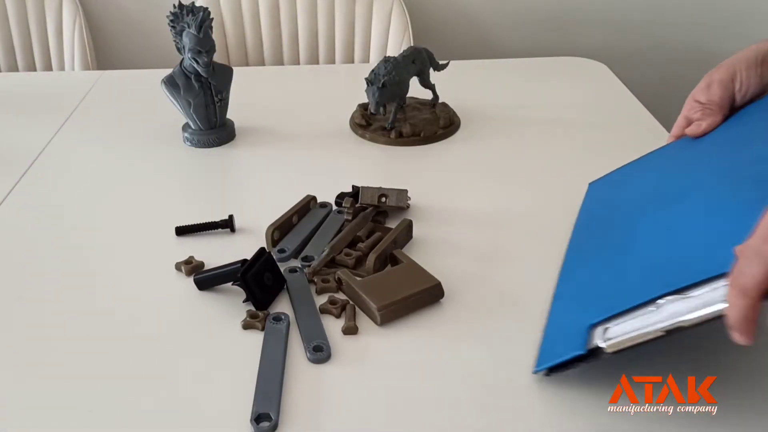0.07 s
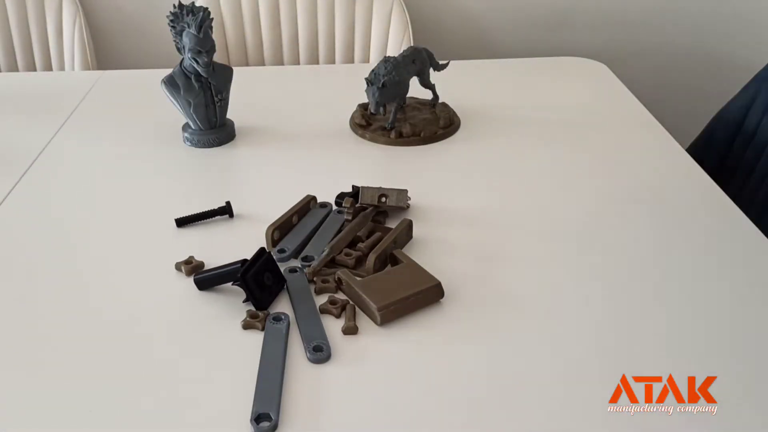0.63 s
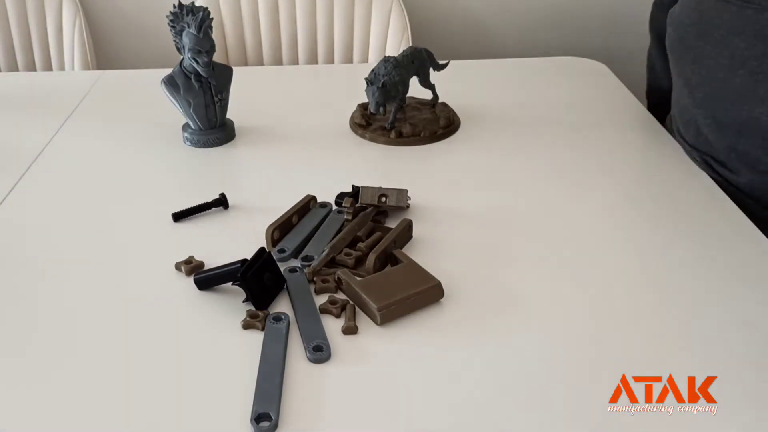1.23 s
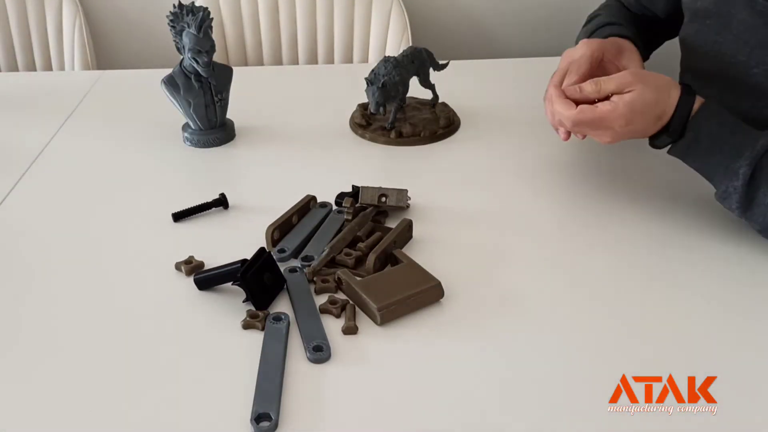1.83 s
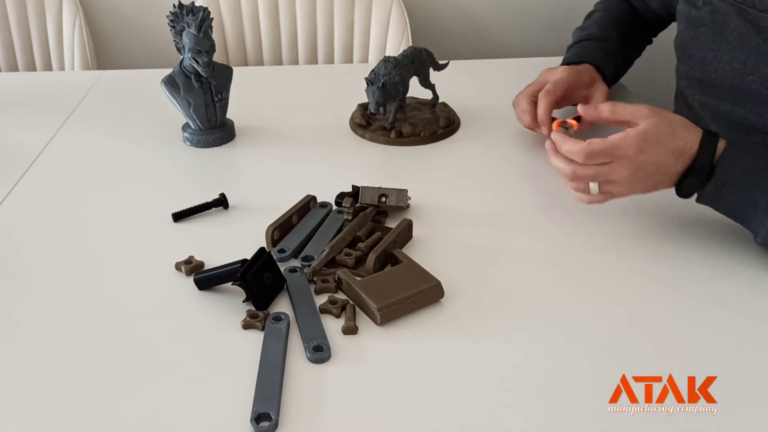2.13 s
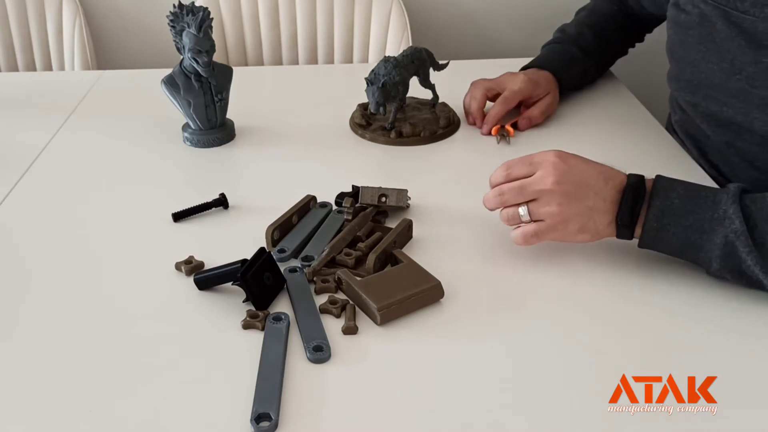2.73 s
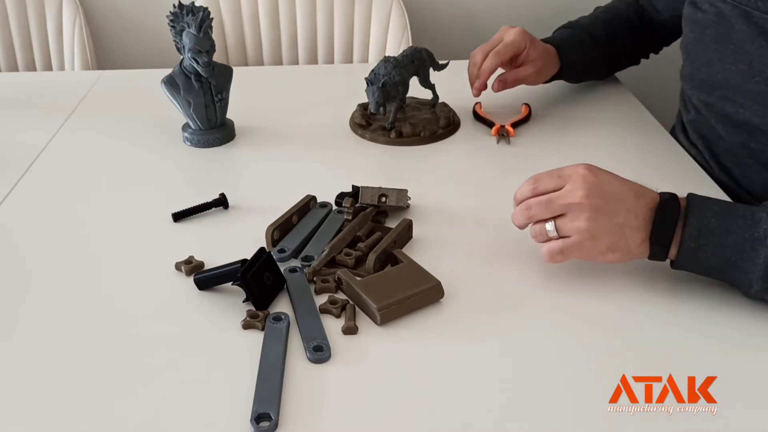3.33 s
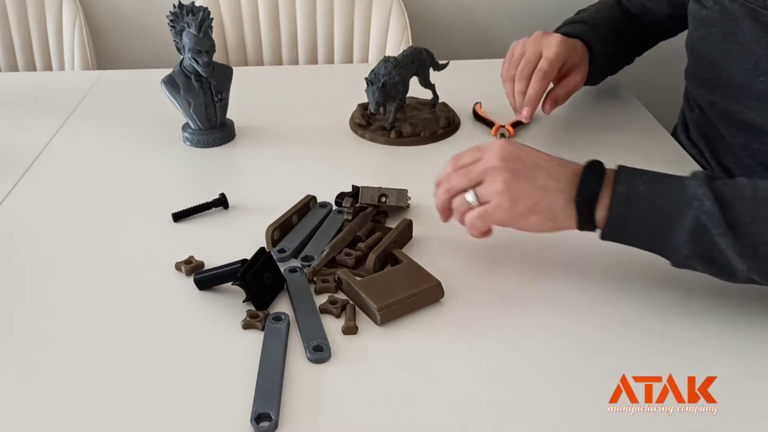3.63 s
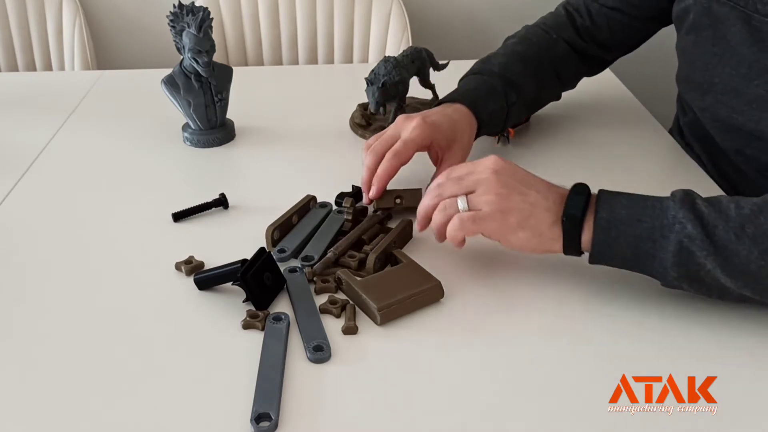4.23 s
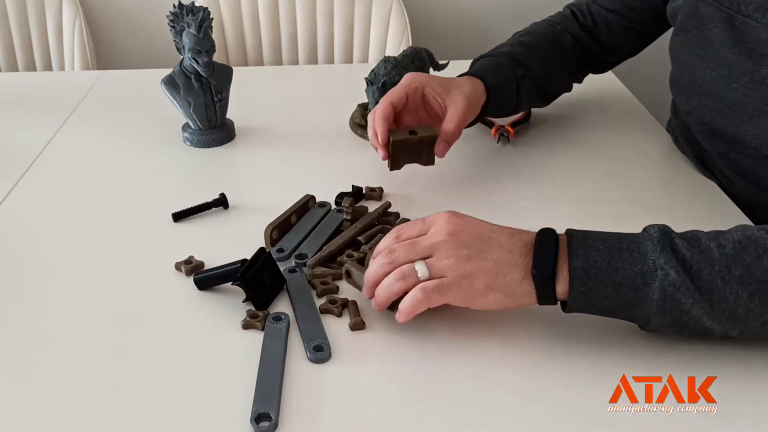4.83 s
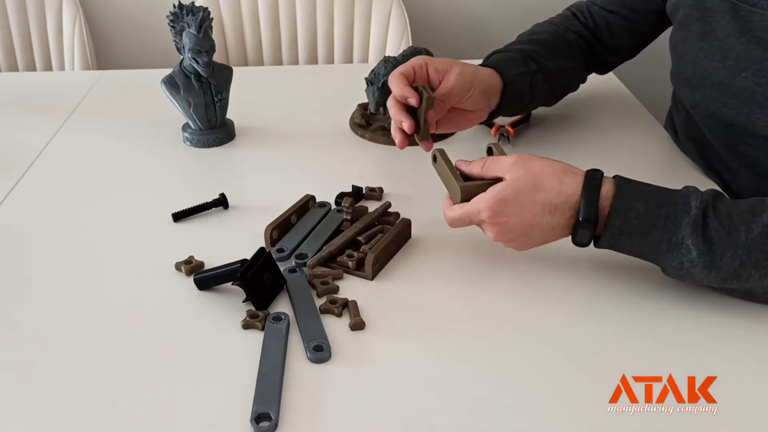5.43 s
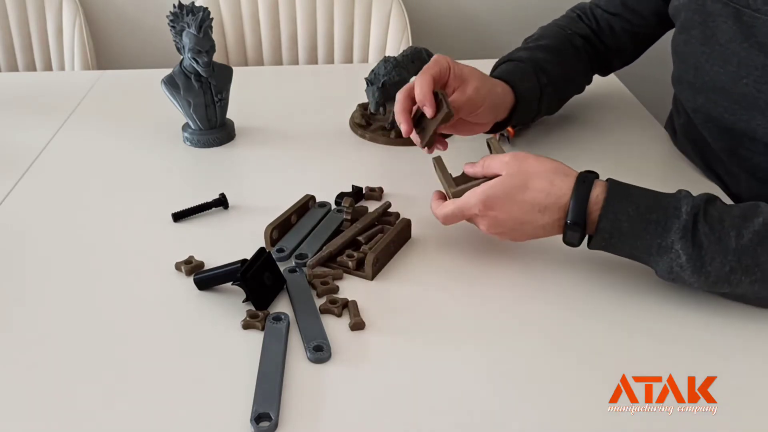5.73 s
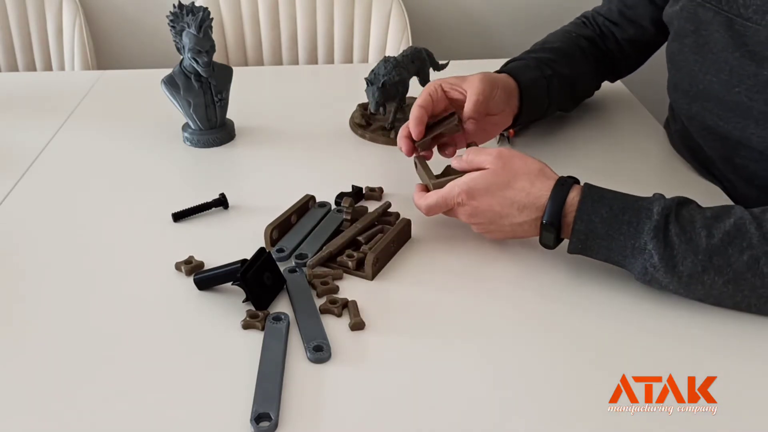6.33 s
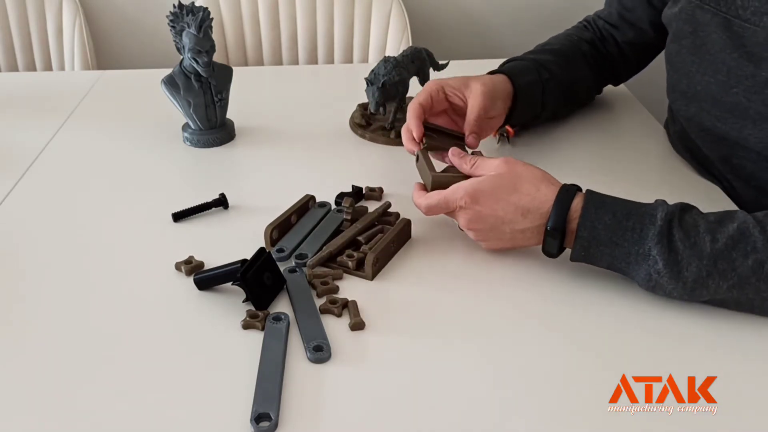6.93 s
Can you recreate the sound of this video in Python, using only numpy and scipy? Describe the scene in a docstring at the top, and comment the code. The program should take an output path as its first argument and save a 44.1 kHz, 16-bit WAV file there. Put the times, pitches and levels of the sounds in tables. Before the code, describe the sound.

A clipboard slides off a table with a brief, bright rattle of its clip, then taps lightly farther away until about 1 second. Clothes rustle, and from 1 to 2 seconds someone sits down with dull bumps against the furniture. A hand thuds softly on the table at 2.4 seconds. At 2.7 steel pliers drop with a short, ringing clunk, the loudest sound. From about 3.9 to 4.8 seconds hands rake through hard plastic parts, which clack, scrape and judder while the tabletop booms beneath them. Fingers slide over a piece, with hollow knocks around 5.2 seconds and a couple of dull bumps. Fingernails tick near 6.1, then two parts click and rub together around 6.5, thinning to faint ticks by 6.9. Sleeves rustle with the movements. The room is small and bare, the stereo microphone close to the table, with a steady low wash of air behind.

```python
"""A small, bare room, with a small stereo microphone close to the table and a low wash of air behind.
Someone slides a rattling clipboard aside, sits down with dull bumps and drops steel pliers on the table.
Hands rake through a pile of hard plastic parts, which clack and judder while the tabletop booms under
them, then pick two out and click them together. Sleeves rustle near the microphone with each movement."""
import sys
import numpy as np
from scipy import signal
from scipy.fft import rfft, irfft
from scipy.io import wavfile
from scipy.ndimage import uniform_filter1d

SR = 44100
rng = np.random.default_rng(int(sys.argv[2]) if len(sys.argv) > 2 else 0)


def store_pcm(level_fs):
    """Save levels as 16-bit WAV."""
    pcm = np.round(np.clip(level_fs, -1, 1) * 32767).astype(np.int16)
    wavfile.write(sys.argv[1], SR, np.atleast_2d(pcm).T)


N = 312228
AGE = np.arange(SR) / SR  # seconds since a blow
CONTACT_S = 0.0008  # from first touch to the sound of the blow

# Blows. Each row: start in seconds, relative level in dB.
CLIP_RATTLES = [(0.0055, -34.5), (0.008, -24.5), (0.0175, -33), (0.037, -27), (0.0465, -34), (0.064, -46),
                (0.1002, -32.5), (0.11, -46), (0.1165, -39), (0.126, -50), (0.1385, -40), (0.15, -46),
                (0.16, -53)]
HAND_THUDS = [(2.389, -38), (2.399, -48.5)]
PLIER_BLOWS = [(2.6918, -40), (2.709, -46), (2.719, -46.5), (2.7306, -14.5), (2.7358, -24.5), (2.7445, -26),
               (2.7485, -32), (2.754, -33)]
HOLLOW_KNOCKS = [(5.213, -47), (5.22, -43.5), (5.231, -45.5), (5.244, -45), (5.265, -52.5)]
NAIL_TICKS = [(5.6714, -70), (6.069, -61), (6.1173, -50), (6.1664, -63)]
# The clipboard, farther off. Each row: start in seconds, relative level in dB, tilt in dB per octave.
FAR_TAPS = [(0.214, -44, 0), (0.334, -43.5, 1.5), (0.351, -50, 2.5), (0.455, -46, -0.5), (0.466, -46, -2.5),
            (0.515, -54, -7), (0.608, -44.5, 1), (0.618, -48, 3), (0.752, -45, 3), (0.955, -46, -2),
            (1.062, -42.5, 1.5)]
# The body meets the furniture. Each row: start in seconds, relative level in dB, main ring in Hz.
BODY_BUMPS = [(1.099, -48, 890), (1.144, -48.5, 912), (1.192, -49, 666), (1.241, -51, 410),
              (1.258, -55.5, 324), (1.349, -61, 353), (1.563, -53, 388), (1.905, -49.5, 422),
              (5.344, -46, 333), (5.354, -62, 350), (5.543, -54.5, 410)]
# Loose parts collide. Each row: start in seconds, relative level in dB, tilt in dB per octave,
# main ring in Hz.
CLACKS = [(3.947, -46.5, 6, 3620), (3.9763, -39, 5.5, 3740), (3.987, -41.5, 0, 3540),
          (3.994, -41, -1, 4100), (4.069, -44, 3, 3800), (4.079, -38, -2.5, 786),
          (4.0853, -35.5, -1.5, 3720), (4.093, -41, 1, 4080), (4.158, -39, 5, 3870),
          (4.165, -43.5, 0, 4060), (4.179, -34.5, -2.5, 3930), (4.188, -29.5, -0.5, 3310),
          (4.197, -46, -1, 2120), (4.268, -38.5, -7.5, 1017), (4.278, -40, -7.5, 890),
          (4.297, -51, -7, 797), (4.373, -46, 1, 2130), (4.422, -41.5, 0, 1280), (4.489, -40, -2, 1480),
          (4.5605, -25.5, -0.5, 4070), (4.569, -33, 6, 6400), (4.573, -31.5, -2, 718),
          (4.584, -33, -1, 1570), (4.629, -33, -3, 3840), (4.632, -28, 0, 1487), (4.682, -39, 9, 2140),
          (4.692, -33, 2, 1285), (4.706, -34.5, -3.5, 1270), (4.721, -37.5, 7, 2960),
          (4.733, -38, -6, 3100), (4.777, -43, -3, 2900)]
# Two held parts meet. Each row: start in seconds, relative level in dB, tilt in dB per octave,
# ring of the small part in dB, ring of the large part in dB.
SNAPS = [(6.241, -55.5, -2, -5, -12), (6.465, -34, 1, 3.5, -10), (6.4724, -39, 0.5, 8.5, -11),
         (6.482, -54, 7, 3, 2), (6.485, -48, -2, 7, -1), (6.4945, -43.5, -4.5, -10, -4),
         (6.512, -53, 5, -3, -6), (6.525, -44, -2, -11, -9), (6.5734, -44.5, 1, 3, 3),
         (6.6022, -44.5, 5, -3, 8), (6.629, -61, 7, 3, 1), (6.7344, -61, 2, -5, -3),
         (6.819, -55, -2, 3, -8), (6.845, -63, -7, -3, -7), (6.893, -61, -1.5, -9, -12)]

# Sliding movements. Each row: start in seconds, length in seconds, relative level in dB.
BOARD_SLIDE = [(-0.05, 0.13, -41), (0.064, 0.13, -50.5), (0.168, 0.074, -62)]
RAKING = [(3.938, 0.18, -53.5), (4.152, 0.17, -53.5), (4.35, 0.27, -53), (4.522, 0.27, -55.5)]  # hands through the pile
FINGERING = [(4.863, 0.48, -65), (5.186, 0.16, -67.5), (5.296, 0.16, -67), (5.536, 0.26, -88)]  # skin on a part
RUBBING = [(6.457, 0.096, -48), (6.58, 0.05, -56), (6.7, 0.088, -64), (6.818, 0.1, -57)]  # part on part
# Arms and body move. Each row: start in seconds, length in seconds, relative hiss and rustle in dB.
GESTURES = [(0.147, 0.53, -72.5, -64), (0.524, 0.31, -74.5, -63.5), (0.75, 0.48, -66.5, -59),
            (0.916, 0.089, -68.5, -89), (0.993, 0.73, -74.5, -60), (1.51, 0.52, -73.5, -63),
            (2.203, 0.51, -82, -65.5), (3.336, 0.31, -74.5, -66), (3.5, 3.8, -85.5, -80),
            (4.867, 0.84, -77.5, -63.5), (5.305, 0.085, -75, -59), (5.447, 1.07, -79.5, -70.5)]
# Dragged parts judder. Each row: start in seconds, length in seconds, relative level in dB, ring in Hz.
DRAGS = [(3.947, 0.091, -57, 754), (4.196, 0.19, -57.5, 807), (4.37, 0.071, -70, 6560),
         (4.53, 0.052, -49, 2170), (4.692, 0.047, -45.5, 1300), (4.676, 0.064, -48.5, 2170)]

# How each thing rings. Each row: frequency in Hz, relative level in dB, seconds to die away by 60 dB.
BOARD_MODES = [(900, -14, 0.052), (1220, -1, 0.055), (1605, 0, 0.035), (1740, -1, 0.062), (2060, -3, 0.07),
               (2410, 1, 0.039)]
PLIER_MODES = [(120.3, -26.5, 0.81), (191.7, -22.5, 1), (266, -8.5, 0.26), (456, -11, 0.2), (600, -3, 0.12),
               (1070, -15, 0.066), (1154, 2.5, 0.1), (1390, 3.5, 0.11), (1533, 2, 0.067),
               (1694, -14, 0.064), (2030, -15, 0.035), (2047, 4, 0.068), (2200, -14, 0.043),
               (2500, -17, 0.08)]
TABLE_MODES = [(123.4, 4.5, 0.77), (193, -5, 0.71), (265, -11, 0.55), (357, 3, 0.12), (439, -4.5, 0.17),
               (624, -3.5, 0.36), (756, -3, 0.12)]
HOLLOW_MODES = [(305.5, -3.5, 0.18), (355, -6, 0.15), (405, -1, 0.23), (478.5, 3.5, 0.3), (521, 5, 0.15),
                (750, 2, 0.064)]
SMALL_PART_MODES = [(1127, -5.5, 0.047), (1650, -9, 0.026), (1880, -4, 0.029), (2755, 6.5, 0.018),
                    (2957, 1, 0.063), (3550, -21, .025), (4300, -1, 0.028)]
LARGE_PART_MODES = [(1333, -8.5, 0.1), (2035, 3, 0.04), (2100, 1, 0.042), (3200, -5, .03),
                    (3995, -1, 0.047), (4500, -3, 0.029), (5450, -5, 0.03), (6500, -12, 0.11)]
# A loose part's modes. Each row: ratio to its main ring, relative level in dB, seconds to die away
# by 60 dB when that ring is at 1500 Hz.
PART_CLUSTER = [(.76, -9, .03), (.86, -2, 0.034), (.93, 2, 0.026), (1, 3.5, 0.04), (1.07, -1, 0.026),
                (1.15, -4, 0.028), (1.3, -4, 0.035), (1.62, -9.5, .025)]

# Tone colours. Each row: frequency in Hz, relative gain in dB.
AIR_TONE = [(20, -30), (45, -8.5), (70, -1.5), (130, 3), (300, 0), (600, -5), (1100, -12), (2500, -17.5),
            (5000, -17), (7500, -20), (14000, -13.5)]
CLIP_TONE = [(100, -29), (600, -9), (1700, -8), (3000, -6), (4300, 6.5), (7500, -1.5), (14000, -23)]
BOARD_SLIDE_TONE = [(20, -24), (60, -13), (160, -1.5), (600, -0.5), (1000, -2.5), (1700, 0.5), (3000, -5.5),
                    (4500, -6), (7500, -18), (14000, -24)]
FAR_TAP_TONE = [(20, -34), (100, -18), (300, 4), (700, 9.5), (1100, 4.5), (1800, 1), (3100, -5),
                (4500, -18), (14000, -31)]
SLEEVE_TONE = [(100, -18), (600, -7), (1500, -15), (4000, -2), (5500, -11), (7400, 7.5), (9000, -1.5),
               (14000, 7.5)]
BODY_TONE = [(40, -21), (120, -6), (300, -8), (600, -9.5), (1100, -15), (2500, -17), (6000, -16.5),
             (14000, -72)]
THUD_TONE = [(20, -47), (100, -12), (250, 3.5), (700, -0.5), (1100, -2), (1600, -13), (2200, -8),
             (3500, -35), (14000, -35)]
PLIER_TONE = [(20, -54), (60, -12), (150, -12), (270, 0.5), (380, -3.5), (540, -5), (750, -3.5), (1100, -1),
              (1500, -3.5), (2100, -1.5), (3000, -9.5), (4500, -19.5), (7500, -33), (10000, -46),
              (14000, -33)]
DEEP_BASS_CUT = [(30, -25), (100, -2)]  # deep bass is kept faint
PILE_TONE = [(20, -36), (60, -26), (200, -21), (420, -2), (700, 4.5), (1000, 5.5), (1500, 3.5),
             (2800, -1.5), (4200, -0.5), (7000, -7.5), (14000, -36)]
SCRAPE_TONE = [(20, -43), (60, -38), (200, 3), (400, 2.5), (780, 1), (1050, -3.5), (1600, 1), (2800, -7.5),
               (4200, -8.5), (7000, -18), (14000, -25)]
HELD_TONE = [(100, -36), (700, -2), (1100, 0.5), (2000, 5.5), (2400, 3.5), (3600, -3), (4500, 3.5),
             (5300, -4.5), (8000, -10.5), (14000, -13)]
HOLLOW_TONE = [(20, -44), (70, -23), (200, -8.5), (350, 5.5), (480, 2), (750, -8), (1100, -14), (1900, -16),
               (3000, -39), (14000, -45)]
NAIL_TONE = [(200, -31.5), (3200, -11), (4500, 14.5), (7000, 9), (14000, -32)]
UNEVEN_TREBLE = [(4500, 0.5), (5100, -5), (5900, -2.5), (6600, 6), (8350, 1), (8850, -20), (11250, -19),
                 (11700, -6)]  # one shallow dip and one deep one

# The room's reverberation. Each row: frequency in Hz, seconds to die away by 60 dB.
ROOM_DECAY = [(100, 0.29), (300, 0.53), (1000, 0.45), (2500, 0.36), (5000, 0.37), (8000, 0.14),
              (14000, 0.38)]
# Diffuse sound at the microphone. Each row: frequency in Hz, likeness of left and right from 0 to 1.
COHERENCE = [(50, 0.1), (130, 0.35), (300, 0.71), (700, 0.28), (1400, 0.04), (3000, 0.09), (15000, 0)]


def amp(db):
    """Decibels to gain."""
    return 10 ** (np.asarray(db) / 20)


def unit(x):
    """Scales to rms 1."""
    return x / np.sqrt(np.mean(x ** 2) + 1e-20)


def norm(x):
    """Scales to energy 1."""
    return x / np.sqrt(np.sum(x ** 2) + 1e-20)


def read(points, hz):
    """Reads a table on a log-frequency axis."""
    f, value = np.transpose(points)
    return np.interp(np.log(hz + 1), np.log(f + 1), value)


def add(mix, start, sound):
    """Mixes a sound in at start seconds."""
    part = mix[max(round(start * SR), 0):][:len(sound)]
    part += sound[:len(part)]


def colour(x, tone, tilt_db=0, size=4096):
    """Minimum-phase filter with a given tone, tilted by tilt_db per octave about 1.5 kHz."""
    hz = abs(np.fft.fftfreq(size, 1 / SR))
    octaves = np.log2(np.clip(hz, 300, 9000) / 1500)
    log_gain = np.log(amp(read(tone, hz) + tilt_db * octaves))
    taps = np.fft.ifft(np.exp(np.conj(signal.hilbert(log_gain)))).real
    return signal.oaconvolve(x, taps[:size // 2])[:len(x)]


def even(x, width_hz=130, size=8192):
    """Smooths out the chance humps in the spectrum of a noisy burst."""
    rows = np.atleast_2d(x)
    hz = np.fft.rfftfreq(size, 1 / SR)
    power = uniform_filter1d((abs(rfft(rows, size)) ** 2).mean(0), int(width_hz / hz[1]))
    inverse = np.c_[hz, -10 * np.log10(power / power.mean() + 1e-6)]
    return np.reshape([colour(row, inverse) for row in rows], x.shape)


def diffuse(pair):
    """Two unrelated signals grow alike in the low range, as at a microphone's two close ports."""
    a, b = rfft(pair)
    likeness = read(COHERENCE, np.fft.rfftfreq(pair.shape[1], 1 / SR))
    mid, side = a * np.sqrt((1 + likeness) / 2), b * np.sqrt((1 - likeness) / 2)
    return irfft([mid + side, mid - side], pair.shape[1])


def room(x, wet_db, pan_db=0, lag_s=0, early_db=-5):
    """Direct sound (pan_db louder and lag_s later on the left), nearby reflections and the room's tail."""
    echoes = rng.choice([-1., 1.], (2, SR)) * (rng.random((2, SR)) < 4000 / SR)
    hz, t, spectra = signal.stft(echoes, SR, nperseg=256)
    decay = amp(-60 * t / read(ROOM_DECAY, hz)[:, None])
    tail = signal.istft(spectra * decay, SR, nperseg=256)[1][:, :SR]
    tail = norm(tail * np.clip(AGE / 0.004, 0, 1) ** 2)
    reflections = rng.standard_normal((2, SR)) * (rng.random((2, SR)) < 1200 / SR)
    early = norm(reflections * np.exp(-AGE / 0.0067))
    response = diffuse(amp(wet_db) * tail + amp(early_db) * early) * (AGE < 0.8)
    response[0, round(max(lag_s, 0) * SR)] += amp(pan_db / 2) / np.sqrt(2)
    response[1, round(max(-lag_s, 0) * SR)] += amp(-pan_db / 2) / np.sqrt(2)
    return signal.fftconvolve(x[None], even(response, width_hz=50), axes=1)[:, :N]


def ring(modes, spread_db=2.0, detune=0):
    """Dying modes; their strengths vary with the spot struck, their pitches by the share detune."""
    strength, shift = rng.standard_normal((2, len(modes)))
    sound = np.zeros(SR)
    for k, (hz, db, t60) in enumerate(modes):
        envelope = amp(db + spread_db * strength[k] - 60 * AGE / t60)
        sound += (-1) ** k * envelope * np.sin(2 * np.pi * hz * (1 + detune * shift[k]) * AGE)
    return norm(sound)


def part_modes(hz):
    """The cluster of modes round a main ring at hz; higher-pitched parts are damped sooner."""
    return [(hz * ratio, db, t60 * (1500 / hz) ** 0.22) for ratio, db, t60 in PART_CLUSTER]


def blow(tone, modes, tilt_db, t60, ring_db=0, edge=0, soft_s=0, size=8192):
    """A contact: a sharp edge, a crack of crowded modes that builds over soft_s, then the clear modes."""
    build_up = 1 - np.exp(-AGE[1:size + 1] / max(soft_s, 1e-6))
    crack = norm(rng.choice([-1., 1.], size) * build_up * amp(-60 * AGE[:size] / t60))
    crack[0] += edge
    crack = norm(colour(even(crack), tone, tilt_db))
    crack = np.pad(crack, (0, SR - size))
    return norm(crack + amp(ring_db) * ring(modes)) if modes else crack


def blows(rows, tone, modes, gain_db, t60, tilt_db=0, ring_db=0, edge=0):
    """A run of blows on one object, alike in brightness and in the length t60 of their crack."""
    out = np.zeros(N)
    for start, db in rows:
        add(out, start + CONTACT_S, amp(db + gain_db) * blow(tone, modes, tilt_db, t60, ring_db, edge))
    return out


def friction(tone, per_s, spread_db):
    """Tiny slips at random moments; spread_db scatters their sizes further."""
    slips = rng.standard_normal(N) * (rng.random(N) < per_s / SR)
    sizes = amp(spread_db * np.minimum(rng.exponential(1, N), 3))
    return unit(colour(slips * sizes, tone))


def stroke(start, length, db, peak=0.3, swell=1.0):
    """Gain of one slide, fastest at the share peak of its length; it goes as speed to the power swell."""
    progress = np.interp(np.arange(N) / SR, start + length * np.array([0, peak, 1]), [0, 0.5, 1])
    speed = np.sin(np.pi * np.minimum(progress, 1 - progress))
    return amp(db) * speed ** swell


def skids(rows, t60, follow):
    """Gain of the slides that blows set off: stronger after a harder blow, then braked by friction."""
    power, hardest_db = np.zeros(N), max(row[1] for row in rows)
    for start, db, *_ in rows:
        add(power, start, amp(follow * (db - hardest_db) - 60 * AGE / t60) ** 2)
    return np.sqrt(power)


def air():
    """Room tone all round the microphone: a steady low wash with a faint hiss on top."""
    wash = np.array([colour(noise, AIR_TONE) for noise in rng.standard_normal((2, N))])
    return amp(-62) * unit(diffuse(wash))


def clipboard():
    """Close by, the board slides off and its clip rattles; farther off it knocks, soft and roomy."""
    rattle = blows(CLIP_RATTLES, CLIP_TONE, [], gain_db=14, t60=0.011, tilt_db=-2.5, edge=0.9)
    near = room(rattle, wet_db=-5, lag_s=-0.00005, early_db=-9)
    dragging = sum(stroke(*row) for row in BOARD_SLIDE)
    slide = dragging * friction(BOARD_SLIDE_TONE, per_s=4100, spread_db=0)
    far = np.zeros(N)
    for start, db, tilt_db in FAR_TAPS:
        tap = blow(FAR_TAP_TONE, BOARD_MODES, tilt_db, t60=0.066, ring_db=-6, soft_s=0.0067)
        add(far, start + CONTACT_S, amp(db + 14) * tap)
    near += room(slide, wet_db=1.5, lag_s=-0.00005, early_db=3.5)
    return near + room(far, wet_db=3.5, early_db=4.5)


def clothes():
    """Sleeve fibres slip and hiss right at the microphone; folds of cloth rustle lower, in the room."""
    brushing, folding = np.zeros(N), np.zeros(N)
    for start, length, hiss_db, rustle_db in GESTURES:
        brushing += stroke(start, length, hiss_db, peak=0.42)
        folding += stroke(start, length, rustle_db, peak=0.42, swell=0.92)
    fibres = np.array([friction(SLEEVE_TONE, per_s=8400, spread_db=-1) for side in "LR"])
    hiss = amp(11.5) * brushing * fibres * amp([[-1.5], [1.5]])  # a little to the right
    folds = amp(-4) * folding * friction(BODY_TONE, per_s=3000, spread_db=3.5)
    return hiss + room(folds, wet_db=0, pan_db=4, lag_s=0.00018)


def body_bumps():
    """The body bumps dully against chair and table."""
    bumps = np.zeros(N)
    for start, db, hz in BODY_BUMPS:
        bump = blow(BODY_TONE, part_modes(hz), tilt_db=-2, t60=0.04, ring_db=0.5, edge=0.68)
        add(bumps, start, amp(db + 20) * bump)
    return room(bumps, wet_db=2.5, lag_s=0.00028)


def pliers():
    """Close to the microphone a hand comes down on the table, then the pliers' steel jaws drop on it."""
    hand = blows(HAND_THUDS, THUD_TONE, [], gain_db=18.5, t60=0.31, tilt_db=-1.5, edge=0.27)
    jaws = blows(PLIER_BLOWS, PLIER_TONE, PLIER_MODES,
                 gain_db=19, t60=0.041, tilt_db=0.9, ring_db=-3.5, edge=0.49)
    radiated = colour(hand + jaws, DEEP_BASS_CUT)
    return room(radiated, wet_db=-4.5, pan_db=0.5, lag_s=0.00005, early_db=-2.5)


def pile():
    """Raked parts collide, judder and skid on; the tabletop booms under them, close and nearly dry."""
    clacks, thumps, judder = np.zeros((3, N))
    for start, db, tilt_db, hz in CLACKS:
        clack = blow(PILE_TONE, part_modes(hz), tilt_db, t60=0.063, ring_db=-0.5, edge=0.13)
        add(clacks, start, amp(db + 14.5) * clack)
        add(thumps, start, amp(db + 12) * ring(TABLE_MODES))
    slips = friction(PILE_TONE, per_s=2700, spread_db=7)
    for start, length, db, hz in DRAGS:
        singing = unit(signal.oaconvolve(slips, ring(part_modes(hz)))[:N])
        judder += stroke(start, length, db, peak=0.16) * singing
    pushed = sum(stroke(*row, peak=0.088, swell=0.24) for row in RAKING)
    sliding = np.hypot(pushed, amp(-47.5) * skids(CLACKS, t60=0.099, follow=0.29))
    scrape = amp(-2) * sliding * friction(SCRAPE_TONE, per_s=2500, spread_db=3.5)
    rumble = amp(-7.5) * signal.oaconvolve(scrape, ring(TABLE_MODES))[:N]
    boom = colour(thumps + rumble, DEEP_BASS_CUT)
    parts = room(clacks + judder + scrape, wet_db=-1, pan_db=-1, lag_s=-0.00005, early_db=1.5)
    return parts + room(boom, wet_db=-20, early_db=-30)


def held_parts():
    """Fingers slide on two parts, which then chatter together and rub; each contact rings both."""
    touch = sum(stroke(*row, peak=0.15) for row in FINGERING)
    skin = amp(-5.5) * touch * friction(HELD_TONE, per_s=4800, spread_db=1.5)
    snaps = np.zeros(N)
    for start, db, tilt_db, small_db, large_db in SNAPS:
        crack = blow(HELD_TONE, [], tilt_db, t60=0.048, edge=0.15)
        small = amp(small_db) * ring(SMALL_PART_MODES, detune=0.0095)  # each grip shifts the modes
        large = amp(large_db) * ring(LARGE_PART_MODES)
        add(snaps, start + CONTACT_S, amp(db + 13) * (crack + small + large))
    slips = friction(HELD_TONE, per_s=2200, spread_db=-0.5)
    sliding = sum(stroke(*row, peak=0.27) for row in RUBBING)
    sliding += amp(-53) * skids(SNAPS, t60=0.22, follow=0.49)
    ringing = unit(signal.oaconvolve(slips, ring(SMALL_PART_MODES) + ring(LARGE_PART_MODES))[:N])
    rub = amp(-7) * sliding * unit(slips + amp(-4) * ringing)
    return room(skin + snaps + rub, wet_db=-1, pan_db=1)


def hollow_part():
    """Near the microphone a hollow part knocks as it is turned in the fingers."""
    knocks = blows(HOLLOW_KNOCKS, HOLLOW_TONE, HOLLOW_MODES,
                   gain_db=26.5, t60=0.047, tilt_db=1.8, ring_db=4, edge=0.43)
    return room(knocks, wet_db=-5, lag_s=0.00011, early_db=-7)


def nail_ticks():
    """Fingernails tick on the held parts, short and bright."""
    ticks = blows(NAIL_TICKS, NAIL_TONE, [], gain_db=15.5, t60=0.028, edge=0.38)
    return room(ticks, wet_db=0, lag_s=0.0002, early_db=7.5)


def scene():
    """Everything that reaches the microphone at the table."""
    settling_in = air() + clipboard() + clothes() + body_bumps() + pliers()
    return settling_in + pile() + held_parts() + hollow_part() + nail_ticks()


def record(dry):
    """The treble comes through unevenly and is cut off above 15.65 kHz."""
    heard = np.array([colour(channel, UNEVEN_TREBLE) for channel in dry])
    low_pass = signal.firwin(511, 15650, window=("kaiser", 9), fs=SR)
    return signal.oaconvolve(heard, low_pass[None], "same")


dry = scene()
out = record(dry)
store_pcm(out)
```